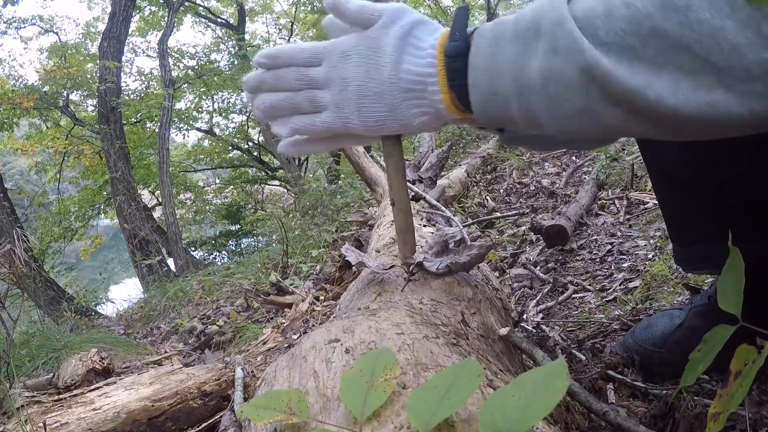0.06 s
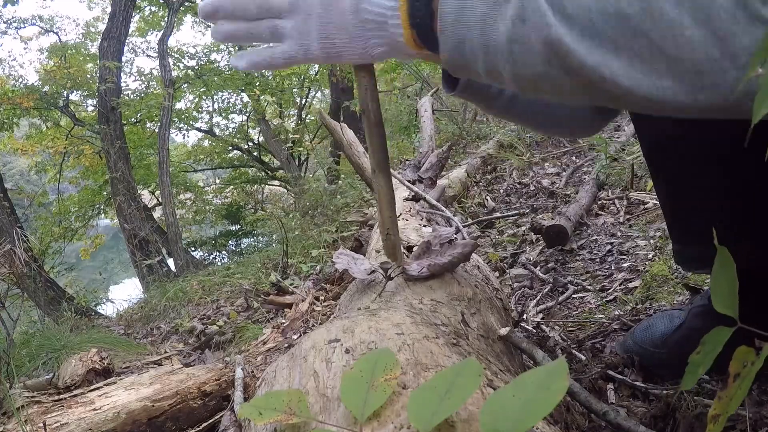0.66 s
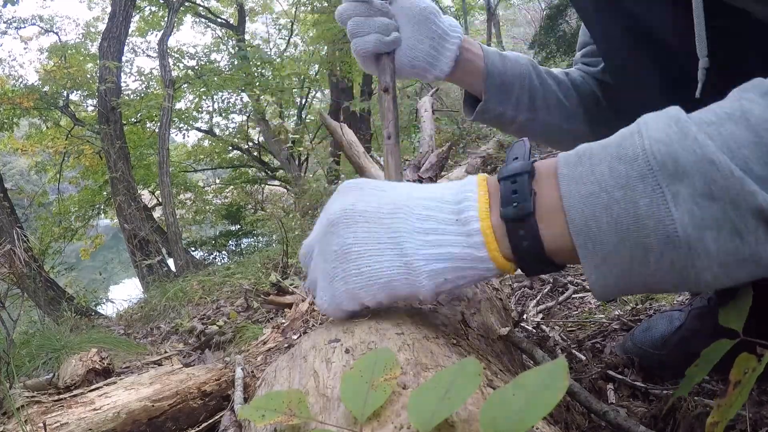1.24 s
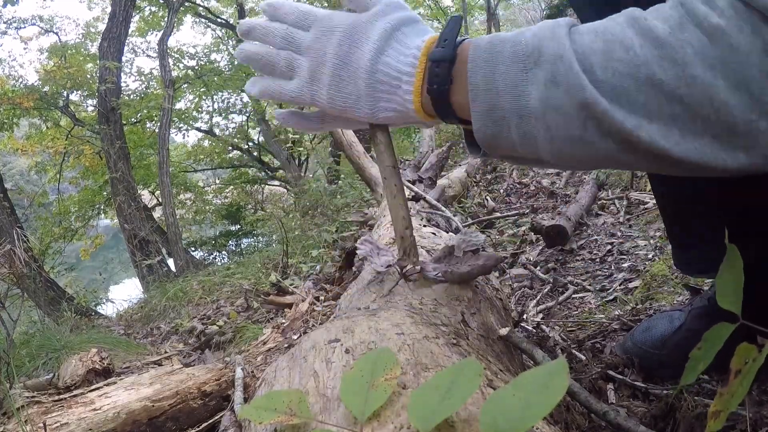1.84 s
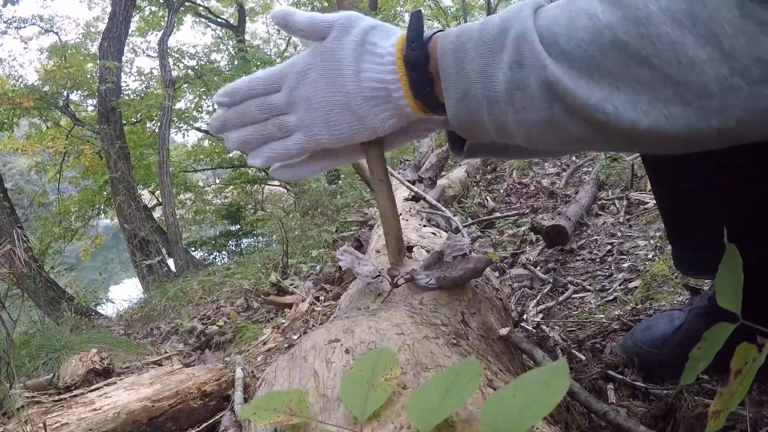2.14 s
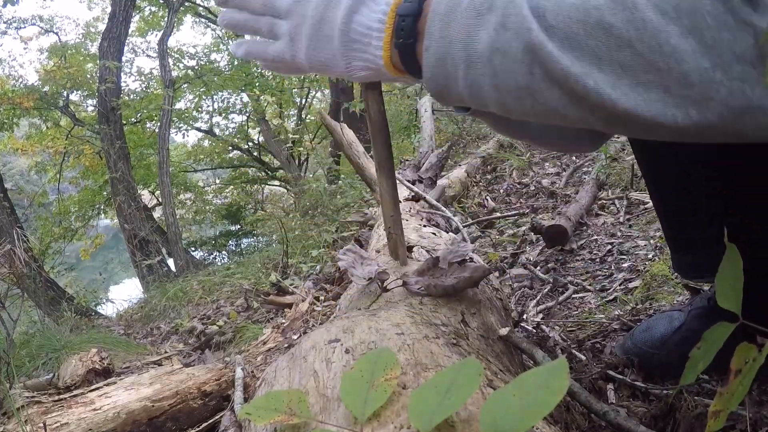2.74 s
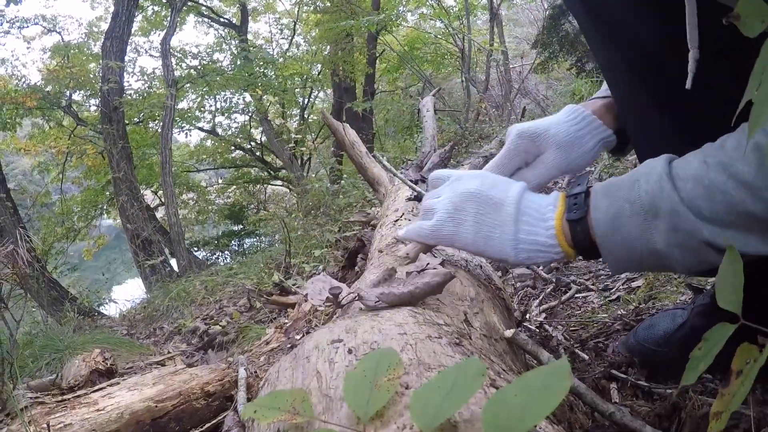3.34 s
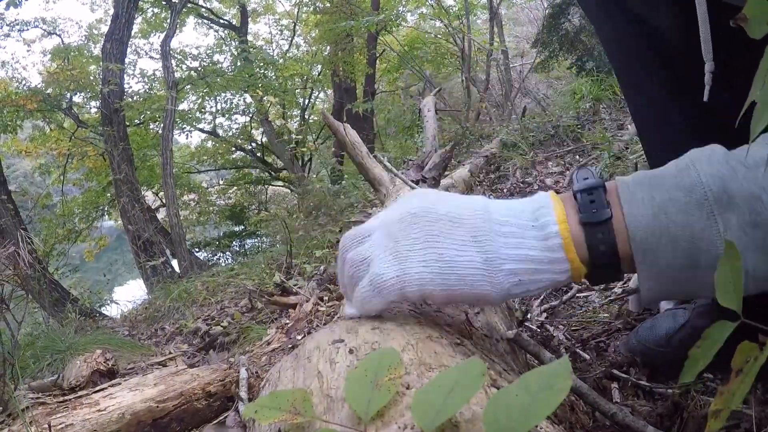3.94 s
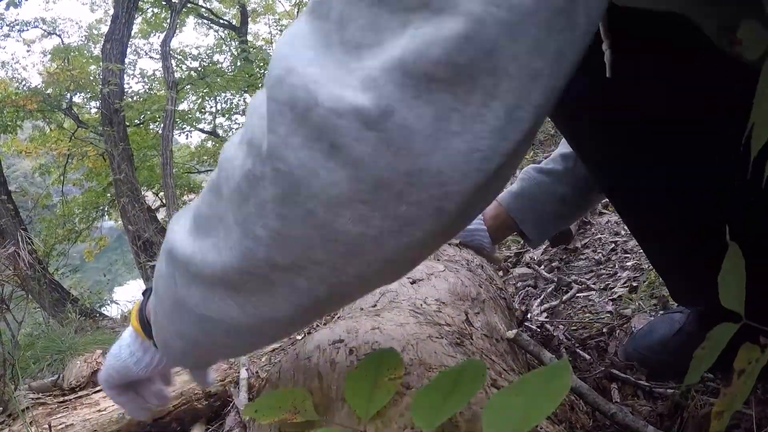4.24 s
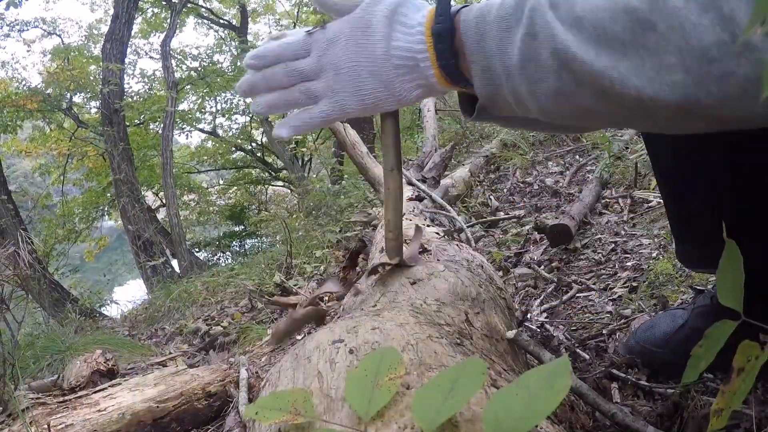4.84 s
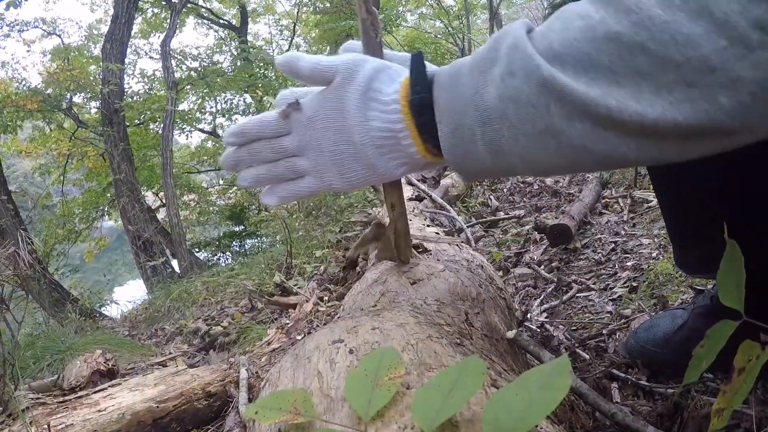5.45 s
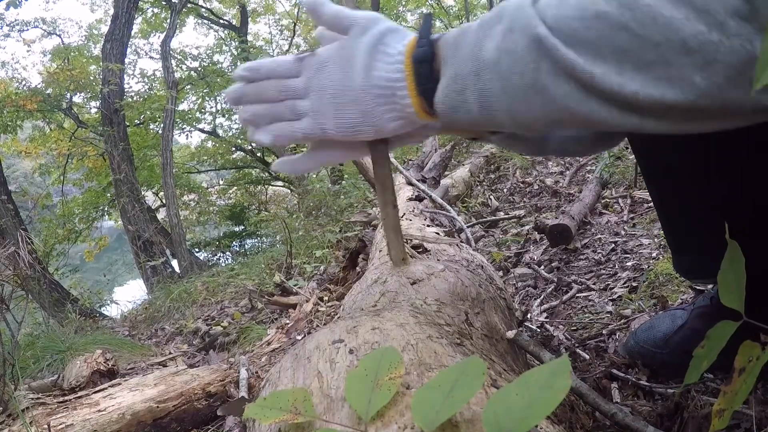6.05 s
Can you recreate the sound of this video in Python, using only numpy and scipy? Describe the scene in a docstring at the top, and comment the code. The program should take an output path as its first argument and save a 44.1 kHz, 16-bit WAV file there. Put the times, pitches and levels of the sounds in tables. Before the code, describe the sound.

A wooden stick is spun between gloved palms against a fallen log, close by. It scrapes in short, dry bursts, with light knocks, tiny fibre snaps and the brush of knitted gloves. Midway, loose bark is dragged off the log with a rough, low rub and a few thuds. After a brief lull the scraping resumes and grows stronger. Forest leaves rustle faintly throughout.

```python
"""Wood scrapes on wood, close by: a spindle twirled between gloved palms in a notch of a fallen log. Its tip
sticks and slips, ringing the wood, and knocks in the notch. A low rumble comes and goes in swells. Knitted
gloves crackle and brush, dry fibres snap, soft contacts thump. Midway, loose bark is dragged off the log, then
drilling resumes. Forest leaves rustle faintly throughout."""
import sys
import numpy as np
from scipy import signal
from scipy.fft import rfft, irfft
from scipy.io import wavfile
from scipy.ndimage import uniform_filter1d

SR = 44100
rng = np.random.default_rng(int(sys.argv[2]) if len(sys.argv) > 2 else 0)


def log_audio(samples):
    """Write samples as a 16-bit WAV file to the path given in sys.argv[1]."""
    # one column per channel
    frames = np.atleast_2d(samples).T
    # limit to full scale, then quantise
    limited = np.clip(frames, -1, 1)
    pcm = np.round(limited * 32767).astype(np.int16)
    wavfile.write(sys.argv[1], SR, pcm)


N = 268657
TIME_S = np.arange(N) / SR
LOW_CUT_HZ = 1105  # steep low cut; thins scrapes and knocks

# bouts of wood rubbing on wood:
# (start [s], end [s], rise per 20 dB [s], scrape [dB], middle over ends [dB], relative glove hiss [dB])
STROKES_S_DB = [(-.1, 0.32, .03, -40, 6, -53.5), (0.751, 1.08, 0.15, -41.5, 0.5, -53.5),
                (1.471, 1.683, 0.09, -36, 10.5, -53.5), (2.088, 2.452, 0.033, -41, -3, -56),
                (2.786, 2.917, 0.098, -48, -0.5, -64), (3.098, 3.203, 0.074, -40, 0.5, -56),
                (3.24, 3.63, .03, -38.5, 4, -53), (4.814, 4.952, 0.14, -39.5, 5, -49),
                (5.321, 5.558, 0.092, -36.5, 4, -44.5), (5.695, 5.908, 0.12, -34.5, 5.5, -51),
                (6.014, 6.2, 0.036, -30, 5, -49.5)]
# spindle in its notch: (frequency [Hz], width [Hz], gain [dB])
WOOD_MODES = [(1227, 137, 15), (1678, 296, 10.5), (1780, 93, -31.5), (2200, 324, 4.5), (2802, 250, -19.5),
              (3010, 83, -45), (3750, 240, -18), (4545, 580, -1.5), (5820, 290, 2.5), (9030, 770, 6),
              (11000, 1100, -11)]
# grinding dust: (frequency [Hz], gain [dB])
DUST_SPECTRUM = [(650, -80), (1100, -3.5), (1240, 2.5), (1410, -1.5), (1670, 3), (1890, -3.5), (2310, -5.5),
                 (2610, -15), (2910, -8), (3670, -25), (6500, -55.5), (8450, -84.5), (14300, -120)]
# swells of low log rumble: (time [s], half length [s], level [dB])
RUMBLE_SWELLS_S_DB = [(.94, 0.067, -69), (1.083, 0.015, -52), (1.153, 0.087, -60), (1.631, 0.041, -41),
                      (1.745, 0.085, -57.5), (2.457, 0.024, -72), (2.904, 0.047, -67), (5.52, 0.055, -39.5),
                      (5.678, 0.052, -54.5), (5.857, 0.073, -34), (6.083, 0.07, -39.5)]
# log rumble: (frequency [Hz], gain [dB])
LOG_SPECTRUM = [(18, -40), (30, -23), (199, 6), (305, -3.5), (440, 0.5), (581, 1), (746, -6), (902, -2),
                (1000, -5.5), (1300, -35), (2200, -120)]
# trunk, lowest mode first: (frequency [Hz], width [Hz], gain [dB])
TRUNK_MODES = [(167, 40, 6), (283, 16, -13), (403, 19, -14.5), (972, 24, -9)]
# glove threads and dry fibres: (frequency [Hz], gain [dB])
FIBRE_SPECTRUM = [(2500, -4.5), (4600, -3.5), (5400, -3), (6100, 1.5), (7200, 0), (8200, -1), (9000, 2.5),
                  (11500, 1), (16000, -2.5)]
# leaves: (frequency [Hz], gain [dB])
FOREST_SPECTRUM = [(30, -28), (100, -44), (155, -43), (230, -52), (480, -25.5), (650, -35.5), (900, -61.5),
                   (1050, -12), (1200, 1), (1650, 3), (2500, -4.5), (5000, -11.5), (10000, -18.5),
                   (16000, -18.5)]
# dry fibres breaking: (time [s], relative level [dB])
SNAPS_S_DB = [(0.017, -54), (0.041, -55), (0.062, -47), (0.107, -47), (0.127, -45.5), (0.161, -51),
              (0.207, -51.5), (0.304, -54), (0.73, -50.5), (1.265, -57.5), (1.316, -55), (1.54, -46),
              (1.74, -55.5), (2.426, -47.5), (2.87, -44), (3.11, -48.5), (3.253, -45), (3.297, -48),
              (4.33, -51), (4.519, -57.5), (4.829, -49), (4.904, -50), (5.353, -50), (5.521, -42.5),
              (5.676, -49), (5.881, -46.5)]
# spindle and bark striking the log:
# (time [s], relative level [dB], ring centre [Hz], crack re ring [dB], thud re ring [dB])
KNOCKS_S_DB_HZ = [(0.304, -29, 1380, -10, -33), (0.5404, -44.5, 1350, -36, -29),
                  (0.6759, -45, 1750, -8, -40), (0.7429, -39, 1730, -9, -33),
                  (0.7724, -52.5, 1660, 6.5, -2.5), (1.0584, -33.5, 1410, -14, -38),
                  (1.1339, -27.5, 1740, -10.5, -13), (1.267, -52, 1760, -17, -19),
                  (1.3018, -49.5, 1770, -13, -13), (1.3485, -48.5, 1520, -24, -25),
                  (1.449, -40, 1760, -15, -36), (1.5322, -33.5, 1440, -9, -44),
                  (1.562, -34.5, 1500, -8.5, -35), (1.7257, -26, 1560, -19.5, -23.5),
                  (1.7494, -39, 1530, -12, -11), (1.7735, -40.5, 1590, -15, -8),
                  (1.8658, -29, 1400, -9, -29.5), (1.9268, -42.5, 1480, -27, -25.5),
                  (2.4193, -35, 1440, -28, -46), (2.5102, -32, 1560, -25, -35.5),
                  (2.5969, -33, 1630, -28, -31.5), (2.6514, -34.5, 1610, -51, -41),
                  (2.8701, -21.5, 1470, -15.5, -65), (2.955, -35.5, 1570, -34, -41),
                  (2.9645, -41, 1710, -35, -38), (2.9761, -42, 1560, -32, -30),
                  (3.0441, -32, 1470, -32, -38), (3.0653, -42, 1590, -22, -26), (3.09, -41, 1470, 0.5, -29),
                  (3.1336, -35, 1260, -12, -39), (3.249, -25, 1340, -10.5, -6.5),
                  (3.2967, -22, 1170, -24, -4.5), (3.4153, -29.5, 1100, -20, -6),
                  (3.4494, -21, 1000, -44, -12), (3.565, -20.5, 1030, -26, -10.5),
                  (3.6436, -40.5, 1580, -22, 9), (3.6794, -35, 1390, -26, 2.5),
                  (3.7211, -43.5, 1370, -36, 9), (3.7299, -37.5, 1460, -25, 4),
                  (3.756, -36.5, 1550, -14, 0.5), (3.8096, -45.5, 1310, -18, 4),
                  (4.463, -47, 1440, -12, -38), (4.6172, -41.5, 1640, -39, -26.5),
                  (4.74, -47.5, 1710, -16, -25), (4.805, -39, 1700, -7, -32),
                  (4.8326, -38.5, 1530, -6, -34), (4.844, -38, 1540, -8.5, -37),
                  (4.915, -33.5, 1670, -9.5, -48), (5.115, -34.5, 1700, -23, -38),
                  (5.1224, -30, 1500, -21, -40), (5.141, -43.5, 1380, -29, -30),
                  (5.2935, -38.5, 1660, -17, -44), (5.68, -27, 1440, -18.5, -19.5),
                  (5.7441, -29.5, 1590, -7, -35), (5.7632, -29.5, 1510, -9, -30),
                  (5.8226, -30, 1500, -10, -30), (5.843, -30, 1330, -26, -12), (5.8822, -29, 1210, -24, -4),
                  (5.9444, -40.5, 1520, -15, -0.5), (6.0209, -27.5, 1520, -23, -14),
                  (6.0415, -25.5, 1460, -10.5, -19), (6.0616, -27.5, 1520, -11, -13),
                  (6.0796, -29, 1390, -3, -12)]
# soft contacts of hand or stick: (time [s], level [dB])
BUMPS_S_DB = [(0.317, -53.5), (1.074, -45.5), (1.615, -40.5), (1.784, -58), (2.605, -70), (5.595, -54),
              (5.914, -41.5)]
# glove brushing stick or log: (time [s], half length [s], relative hiss [dB], grit [dB])
SWEEPS_S_DB = [(0.447, 0.061, -52.5, -60), (1.15, 0.017, -57, -56), (3.615, 0.0051, -43, -53),
               (3.652, .005, -36.5, -45), (3.687, 0.0046, -41.5, -44), (3.731, 0.0032, -35, -37.5),
               (3.765, 0.004, -37.5, -36.5), (3.832, .025, -52.5, -59), (3.944, 0.049, -54.5, -71),
               (4.216, 0.038, -60, -52.5), (4.39, 0.033, -68, -43.5), (5.162, 0.045, -62, -57.5)]
# swept, crumb-strewn surface: (frequency [Hz], width [Hz], gain [dB])
CRUMB_MODES = [(2060, 350, 3.5), (2850, 83, -1.5), (4600, 300, -18), (5600, 790, -15.5), (8750, 600, -41)]
# bark drag envelope: (time [s], relative level [dB])
DRAG_S_DB = [(3.11, -74), (3.17, -37.5), (3.245, -36.5), (3.275, -25.5), (3.35, -29.5), (3.47, -26.5),
             (3.55, -26.5), (3.78, -45.5), (3.86, -60), (4.1, -81.5)]
# dragged bark: (frequency [Hz], gain [dB])
BARK_SPECTRUM = [(18, -69.5), (30, -30), (80, -7), (108, -17.5), (155, 0), (173, -13.5), (209, -8),
                 (300, -5), (340, -13.5), (380, -9.5), (452, -7), (703, -13.5), (1080, -10.5), (1200, -17),
                 (1300, -14), (1690, -35.5), (2860, -120)]


def undb(db):
    """Decibels to gain."""
    return 10 ** (np.asarray(db) / 20)


def unit(x):
    """Scale to rms 1."""
    return x / np.sqrt(np.mean(x ** 2))


def unit_burst(x, span_s=.007):
    """Scale to the energy of rms 1 over span_s."""
    return x / np.sqrt(np.sum(x ** 2) / (span_s * SR))


def bins_hz(x):
    """FFT frequencies of x, floored at 1 Hz."""
    return np.maximum(np.arange(len(x) // 2 + 1) * SR / len(x), 1)


def shape(x, response):
    """Filter by a frequency response."""
    return irfft(rfft(x) * response, len(x))


def colour(x, spectrum):
    """Filter by a spectrum table; rms 1."""
    hz, db = np.transpose(spectrum)
    gain_db = np.interp(np.log(bins_hz(x)), np.log(hz), db)
    return unit(shape(x, undb(gain_db)))


def above(f, hz, order):
    """High-pass response."""
    return 1 / np.sqrt(1 + (hz / f) ** (2 * order))


def below(f, hz, order):
    """Low-pass response."""
    return 1 / np.sqrt(1 + (f / hz) ** (2 * order))


def resonance(f, hz, width_hz):
    """Response of one damped mode."""
    return 1 / (1 + 1j * (f * f - hz * hz) / (f * width_hz))


def modes(f, table):
    """Summed response of damped modes."""
    return sum(undb(db) * resonance(f, hz, width_hz) for hz, width_hz, db in table)


def wander(rate_hz):
    """Smoothed noise; rms 1."""
    size = int(SR / rate_hz)
    return unit(uniform_filter1d(uniform_filter1d(rng.standard_normal(N), size), size))


def grains(rate_hz, spread_db):
    """Random clicks, power levelled over 50 ms."""
    clicks = (rng.random(N) < rate_hz / SR) * rng.choice([-1, 1], N)
    clicks = clicks * undb(spread_db * np.clip(rng.standard_normal(N), -2, 2))
    power = np.abs(uniform_filter1d(clicks ** 2, size=2200))
    return clicks / np.sqrt(power + 1e-6)


def swell(at_s, half_s):
    """Gaussian envelope."""
    return np.exp(-((TIME_S - at_s) / half_s) ** 2)


def add(out, at_s, x):
    """Mix x into out from at_s."""
    start = max(int(at_s * SR), 0)
    out[start:start + len(x)] += x[:max(N - start, 0)]


def strokes(release_s=.0216):
    """Scrape and glove gains: each stroke rises, arches, stops."""
    scraping, hissing = undb(-62), undb(-64)  # the loose stick stirs between strokes
    for start_s, end_s, rise_s, scrape_db, arch_db, glove_db in STROKES_S_DB:
        outside = np.maximum(start_s - TIME_S, 0) / rise_s + np.maximum(TIME_S - end_s, 0) / release_s
        off_centre = np.clip(2 * (TIME_S - start_s) / (end_s - start_s) - 1, -1, 1)
        envelope = undb(-20 * outside - arch_db * off_centre ** 2)
        scraping = np.hypot(scraping, undb(scrape_db) * envelope)
        hissing = np.hypot(hissing, undb(glove_db) * envelope)
    return scraping, hissing


def wood(f):
    """Spindle response: bending waves carry treble faster, so clicks become tiny chirps."""
    dispersion = np.exp(-4j * np.pi * .001281 * np.sqrt(1500 * f))
    return dispersion * above(f, LOW_CUT_HZ, order=18) * below(f, 3710, order=3) * modes(f, WOOD_MODES)


def scrape(scraping):
    """A loose tip ticks; light strokes grind dust; hard strokes slip coarsely and ring the wood."""
    f = bins_hz(TIME_S)
    fine_grains = shape(grains(rate_hz=2200, spread_db=2.5), above(f, LOW_CUT_HZ, order=18))
    dust = colour(fine_grains, DUST_SPECTRUM)
    slips = unit(shape(grains(rate_hz=420, spread_db=4.5), wood(f)))
    ticks = unit(shape(grains(rate_hz=110, spread_db=5), wood(f) * below(f, 2600, order=3)))
    level_db = 20 * np.log10(scraping + 1e-9)
    slip_share = np.clip(.26 + .0469 * (level_db + 39.5), .2, .9)
    tick_share = np.clip(-.13 * (level_db + 47), .02, .85)
    catching = unit(undb(2.3 * wander(rate_hz=190)))  # uneven tip
    grind = catching * (np.sqrt(1 - slip_share) * dust + np.sqrt(slip_share) * slips)
    return scraping * (np.sqrt(1 - tick_share) * grind + np.sqrt(tick_share) * ticks)


def log_rumble(scraping, stroke_share_db=-33):
    """A faint low rumble that comes and goes in swells."""
    swells = sum(undb(db) * swell(at_s, half_s) for at_s, half_s, db in RUMBLE_SWELLS_S_DB)
    gain = undb(stroke_share_db) * scraping + swells
    return gain * colour(grains(rate_hz=1700, spread_db=2.5), LOG_SPECTRUM)


def trunk_ring(shaking, lowest_t60_s=.7, hum_db=-11.5):
    """The trunk hums on after each shake; higher modes die sooner."""
    padded = np.pad(shaking, (0, SR))
    f = bins_hz(padded)
    lowest_hz = TRUNK_MODES[0][0]
    width_hz = np.log(1000) / (np.pi * lowest_t60_s)
    hum = sum(undb(db) * resonance(f, hz, width_hz * hz / lowest_hz) for hz, _, db in TRUNK_MODES)
    return shape(padded, 1 + undb(hum_db) * hum)[:N]


def gloves(hissing, decay_s=.0017):
    """Knitted threads catch and release in bursts of hiss; some pluck free with a tick."""
    catches = grains(rate_hz=150, spread_db=2.6) ** 2
    burst_power = signal.lfilter([1], [1, -np.exp(-1 / (decay_s * SR))], catches)
    hiss = unit(np.sqrt(burst_power)) * rng.standard_normal(N) + .4 * rng.standard_normal(N)
    plucks = .55 * unit(grains(rate_hz=45, spread_db=4))
    brushing = sum(undb(db) * swell(at_s, half_s) for at_s, half_s, db, _ in SWEEPS_S_DB)
    return undb(-4.5) * np.hypot(hissing, brushing) * colour(hiss + plucks, FIBRE_SPECTRUM)


def forest(level_db=-55.2):
    """Faint, even rustle of leaves."""
    gain = undb(level_db + .5 * wander(rate_hz=16.6))
    return gain * colour(rng.standard_normal(N), FOREST_SPECTRUM)


def snaps(decay_s=.0014):
    """Dry fibres break with bright ticks."""
    out = np.zeros(N)
    t = np.arange(1024) / SR
    for at_s, db in SNAPS_S_DB:
        tick = colour(rng.standard_normal(len(t)), FIBRE_SPECTRUM) * np.exp(-t / decay_s)
        add(out, at_s, undb(db + 1.35) * unit_burst(tick))
    return out


def knocks(lead_s=.02, skid_s=.0045, bounce_s=.002217, grip_s=.013, tail_s=.039):
    """Each blow skids in, rings the wood and bounces once; hard ones crack, heavy ones thud."""
    out = np.zeros(N)
    t = np.arange(4096) / SR - lead_s
    after_s = np.maximum(t, 0)
    f = bins_hz(t)
    body = wood(f)
    thud = resonance(f, 503, 156) * below(f, 1080, order=6)
    # damped trunk mode, 1.6 ms late; heavy blows only
    clunk = resonance(f, 930, 263) * above(f, 695, order=4) * np.exp(-2j * np.pi * f * .0016)
    grip = np.exp(-(after_s / grip_s) ** 2)  # the hand damps the ring
    skid = undb(-16) * np.exp(-(t / skid_s) ** 2)
    for at_s, db, ring_hz, crack_db, thud_db in KNOCKS_S_DB_HZ:
        crush_noise, white_noise = rng.standard_normal((2, len(t)))
        force = .05 * crush_noise * (t > 0) * np.exp(-after_s / .002)  # fibres crushing
        force[int(lead_s * SR)] += 1
        force[int((lead_s + bounce_s * (.5 + rng.random())) * SR)] += undb(-4.5)
        heaviness = np.clip(1 + (thud_db + 14) / 8, 0, 1)
        ring = (body + 4.4 * heaviness * clunk) * np.exp(-.5 * (np.log(f / ring_hz) / .23) ** 2)
        crack_top_hz = 7000 * undb(.27 * crack_db)
        crack = body * above(f, 2440, order=8) * below(f, crack_top_hz, order=2)
        free_end_hz = rng.uniform(2060, 3274)  # stick pitch varies with grip
        free_end = resonance(f, free_end_hz, 110) * above(f, LOW_CUT_HZ, order=8)
        parts = [(ring, 0), (crack, crack_db), (free_end, -9.5 + .5 * crack_db), (thud, thud_db)]
        hit = sum(undb(part_db) * unit_burst(grip * shape(force, part)) for part, part_db in parts)
        wood_noise = unit(shape(white_noise, body * below(f, 3200, order=3)))
        # short, even noise tail; cuts off quickly
        tail = undb(-8.5 + .53 * crack_db) * (t > 0) * np.exp(-(after_s / tail_s) ** 4)
        knock = undb(.86) * hit + np.maximum(skid, tail) * wood_noise
        add(out, at_s - lead_s - .0007, undb(db) * knock)
    return out


def bumps(rise_s=.006, decay_s=.024, band_hz=(50, 297)):
    """Soft contacts on the log give short, dull thumps."""
    out = np.zeros(N)
    t = np.arange(8192) / SR
    bandpass = signal.butter(3, band_hz, "band", fs=SR, output="sos")
    for at_s, db in BUMPS_S_DB:
        force = rng.standard_normal(len(t)) * np.exp(-t / decay_s) * (1 - np.exp(-t / rise_s))
        add(out, at_s, undb(db) * unit_burst(signal.sosfilt(bandpass, force), decay_s))
    return out


def sweeps():
    """A glove swishes gritty crumbs over the wood."""
    f = bins_hz(TIME_S)
    surface = modes(f, CRUMB_MODES) * above(f, 1000, order=10) * below(f, 7900, order=4)
    grit = unit(shape(grains(rate_hz=2600, spread_db=8), surface))
    return grit * sum(undb(db) * swell(at_s, half_s) for at_s, half_s, _, db in SWEEPS_S_DB)


def bark_drag():
    """Rough bark judders over the trunk, stirs its low modes and scratches its surface."""
    times_s, levels_db = np.transpose(DRAG_S_DB)
    active = (TIME_S > times_s[0]) & (TIME_S < times_s[-1])
    gain = undb(np.interp(TIME_S, times_s, levels_db)) * active
    judder = grains(rate_hz=1800, spread_db=3.5)
    f = bins_hz(judder)
    rub = colour(judder, BARK_SPECTRUM)
    boom = unit(shape(judder, modes(f, TRUNK_MODES)))
    scratch = unit(shape(judder, wood(f) * above(f, 3370, order=6)))
    return gain * (undb(-3) * rub + undb(-11.5) * boom + undb(-26) * scratch)


def scene():
    """Mono mix beside the log."""
    scraping, hissing = strokes()
    trunk = trunk_ring(log_rumble(scraping) + bark_drag() + knocks() + bumps())
    return (scrape(scraping) + trunk + gloves(hissing) + snaps() + sweeps() + forest())[None]


def record(dry):
    """Steep low-pass on the top treble."""
    top_hz = 15900
    return signal.sosfilt(signal.ellip(10, .2, 70, top_hz, fs=SR, output="sos"), dry)


dry = scene()
out = record(dry)
log_audio(out)
```